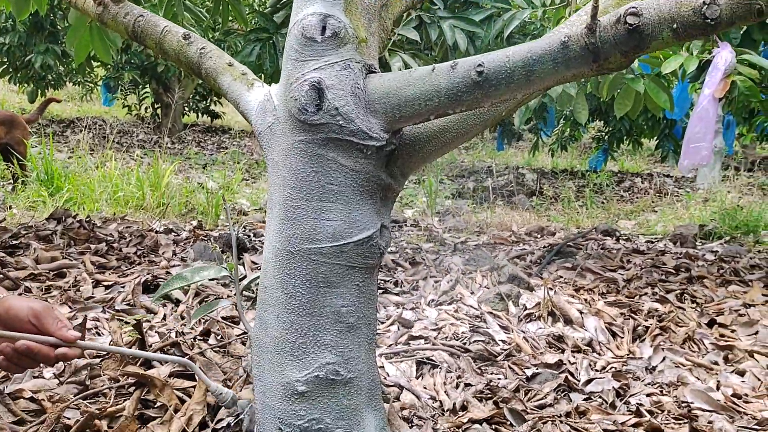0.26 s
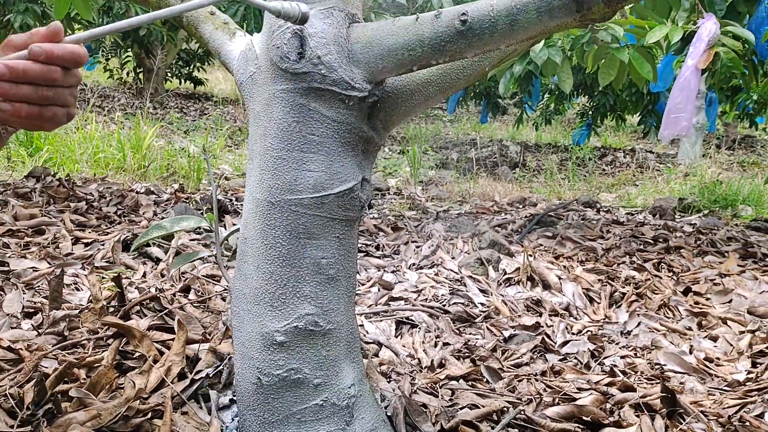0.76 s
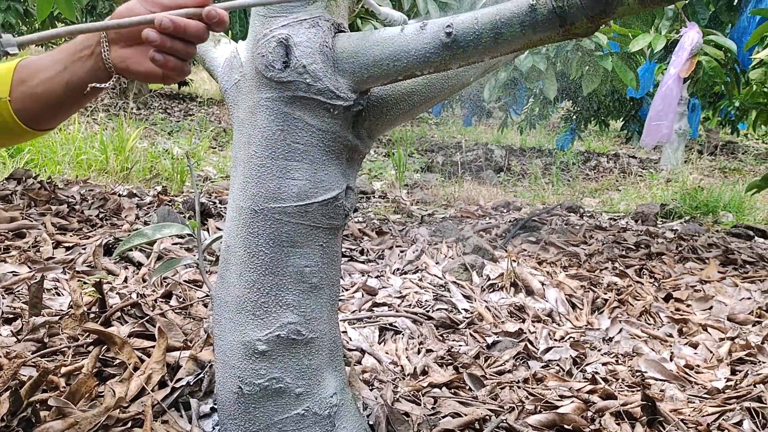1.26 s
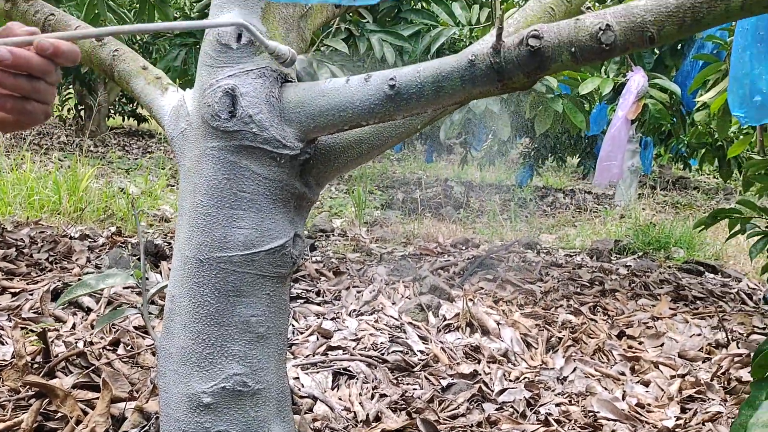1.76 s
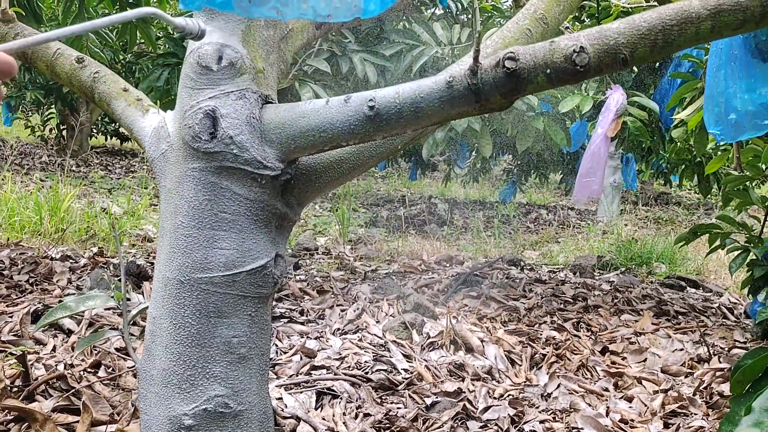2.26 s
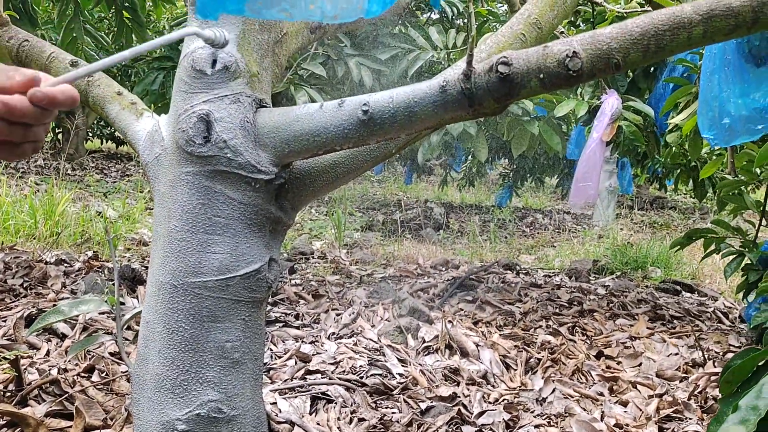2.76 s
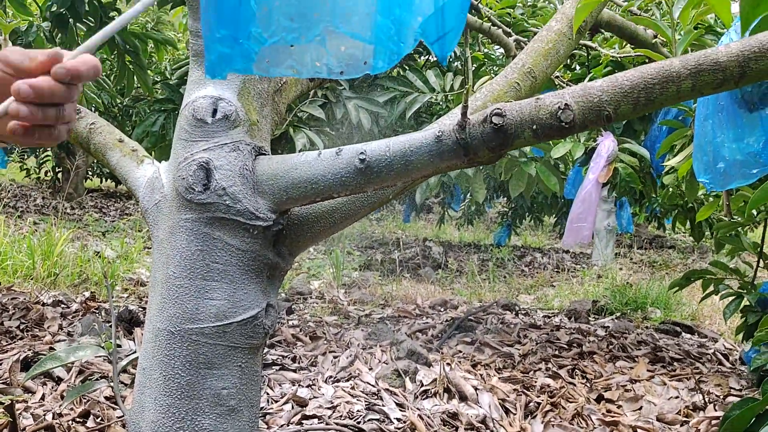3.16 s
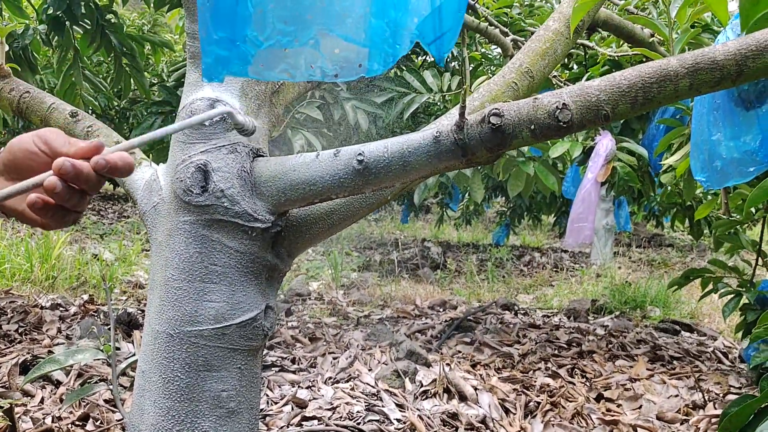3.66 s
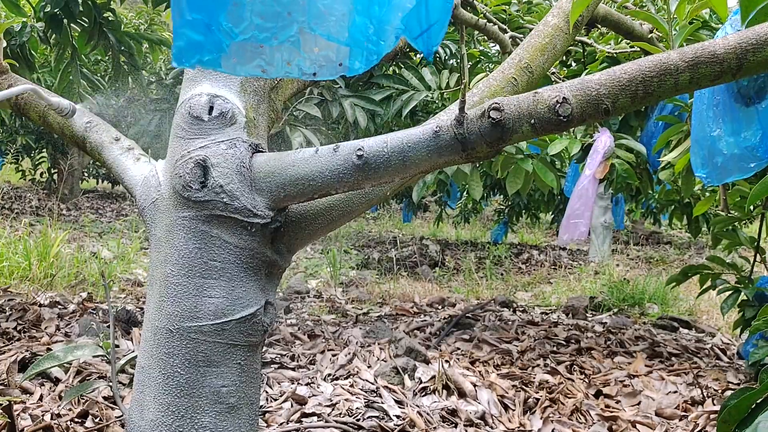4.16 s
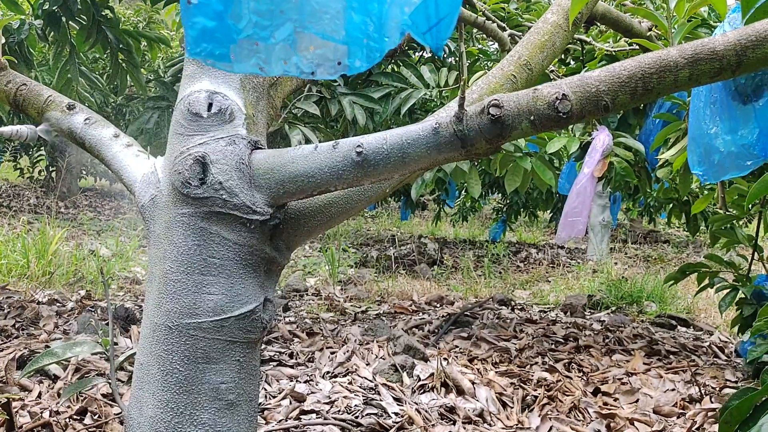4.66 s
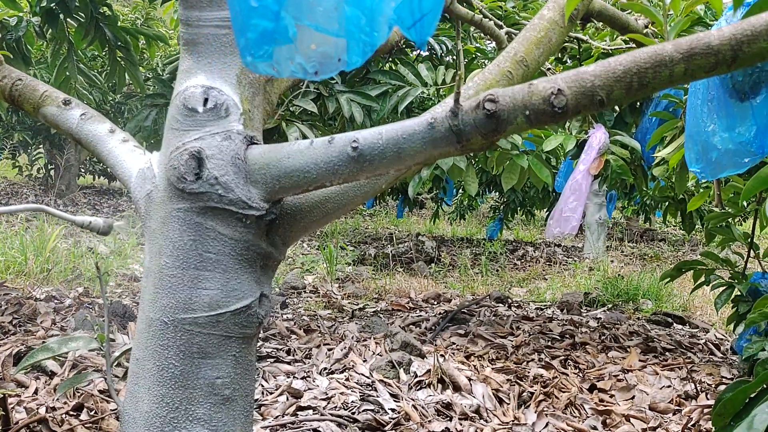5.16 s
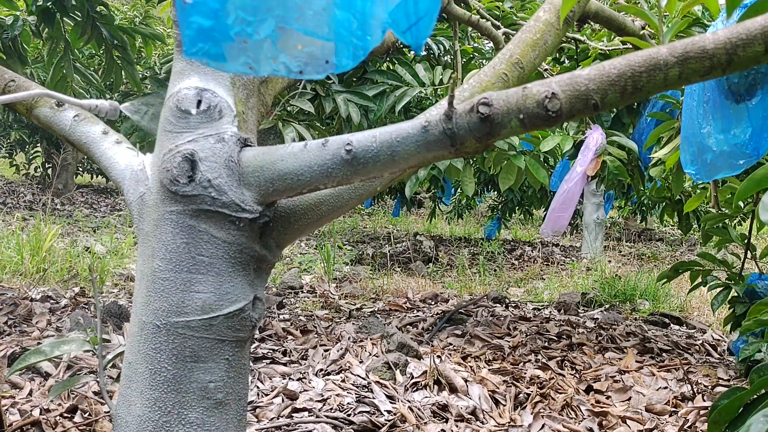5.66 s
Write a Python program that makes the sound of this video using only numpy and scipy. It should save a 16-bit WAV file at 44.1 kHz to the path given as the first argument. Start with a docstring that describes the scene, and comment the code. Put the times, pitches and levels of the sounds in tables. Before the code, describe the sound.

Pressurised liquid fizzes from a wand onto a tree trunk, swelling and fading, with spattering drops and several bright metal clicks outdoors.

```python
"""In an orchard, a backpack sprayer wets a tree trunk, close by and a little to the left. Shaped noise gives
the steady hiss of the nozzle, and random impulses the sizzle of its fan sweeping over bark. Single drops are
short noise bursts, and damped tones ring as the nozzle nears the bark; the metal wand clicks sharply through
its damped modes. Soft bumps, a puff of air and a distant rumble lie underneath; the recorder's gain ducks after
loud clicks."""
import sys
import numpy as np
from scipy import signal
from scipy.fft import rfft, irfft, next_fast_len
from scipy.io import wavfile
from scipy.ndimage import uniform_filter1d, minimum_filter1d, map_coordinates

SR = 44100
rng = np.random.default_rng(int(sys.argv[2]) if len(sys.argv) > 2 else 0)


def int16_out(signal):
    """Quantize to a 16-bit WAV file."""
    q = np.round(np.clip(np.atleast_2d(signal).T, -1, 1) * 32767)
    wavfile.write(sys.argv[1], SR, q.astype(np.int16))


N = 260190  # length [samples]

# In every table, "left minus right" is positive when the left ear is louder.
# The nozzle's own hiss, before random wobble: (time [s], level [dB])
JET_LEVEL = [(0, -46), (.38, -46), (.58, -41.5), (.98, -42), (1.3, -44), (1.7, -40.5), (2.05, -43),
             (2.5, -45.5), (3.35, -46.5), (3.62, -41), (4.1, -49.5), (4.42, -47), (4.6, -41.5),
             (4.75, -47.5), (4.9, -47), (5.3, -41.5), (5.9, -47)]
# Hiss colour as the wand turns: (time [s], main resonance [Hz])
JET_RESONANCE = [(0, 2860), (.35, 2340), (1.1, 2920), (1.42, 3240), (1.65, 2440), (2.25, 2700), (2.6, 3670),
                 (3.05, 4030), (3.5, 3070), (3.7, 4200), (3.9, 2700), (4.35, 2620), (4.65, 3060),
                 (4.88, 2560), (5.1, 3050), (5.9, 2960)]
# Narrow spray resonances as the nozzle passes the wood:
# (start [s], end [s], start frequency [Hz], end frequency [Hz], greatest boost [dB])
GLIDING_RESONANCES = [(.79, 1.13, 1700, 1596, 10), (1.3, 1.48, 7400, 7100, 12),
                      (2.035, 2.2, 2600, 2600, 9.5), (2.84, 3.018, 2940, 2820, 5.5),
                      (4.29, 4.48, 4950, 3750, 6), (4.747, 5.027, 2350, 1680, 11)]
# Brief rings of the cavity as the nozzle comes close to the bark: (time of peak [s], level [dB], pitch [Hz],
# rise time [s])
CAVITY_RINGS = [(.7, -31.5, 1890, 0.0013), (1.45, -35, 2230, .0018), (1.672, -28, 2360, 0.0011),
                (1.7742, -28.5, 2310, 0.0015), (3.497, -32, 2750, 0.0018)]
# Larger drops and spits on the bark: (time of peak [s], level before colouring [dB], rise time [s])
SPIT_DROPS = [(0.1114, -30.5, 0.0011), (0.133, -43, 0.0014), (.382, -37, 0.00065), (0.466, -34, 0.0014),
              (.584, -44, .0007), (0.596, -36.5, 0.0013), (0.699, -34.5, 0.0019), (0.823, -30.5, .0008),
              (.8648, -24, 0.00043), (0.929, -33.5, 0.00095), (1.108, -38, 0.0019), (1.37, -33.5, 0.0028),
              (1.449, -31.5, 0.0016), (1.573, -33, 0.00077), (1.698, -30, 0.0009), (1.734, -29, 0.0027),
              (1.7725, -19, 0.00078), (1.965, -29, .0009), (2.098, -32, .0008), (2.203, -39, 0.0022),
              (3.481, -30.5, 0.0023), (4.308, -38, 0.00087), (4.834, -41, .0016), (5.356, -37, 0.0041),
              (5.545, -41, 0.0011), (5.846, -28.5, 0.00051)]
# Clicks of the wand: (time [s], level [dB], contact length [s], favoured ring [Hz],
# treble lift [dB], knock weight relative to the click [dB], left minus right [dB])
WAND_CLICKS = [(3.1349, -29.5, 0.00023, 3400, 5, -55, 17), (3.275, -20, 0.0066, 3500, 8, -55, 4.5),
               (3.2887, -21.5, 0.0043, 2970, 4.5, -51, 6), (3.9845, -15.5, 0.0032, 3450, 9, -32, 8),
               (5.2673, -26, 0.0024, 2240, -4, -38, 7.5)]
# Damped modes of the wand: (centre [Hz], width [Hz], strength [dB], left minus right [dB])
WAND_MODES = [(3030, 240, 4, 6), (3550, 330, 1.5, -1), (4300, 350, -5, -1), (6550, 300, -3, -14),
              (8550, 160, -5, -2), (9450, 180, -3, 3), (11080, 280, -1.5, 3), (11850, 220, -2, -1),
              (13250, 380, -2, -2), (15000, 240, -1, 3)]
# Thumps of the hand that holds the microphones: (time [s], impulse level before filtering [dB])
HAND_THUMPS = [(.5817, -28.5), (.623, -38)]
# Knocks and dull rings of gear and handled microphones: (time [s], level before a common lift [dB],
# pitch [Hz], T60 [s], rustle share of power [0-1], left minus right [dB])
DULL_KNOCKS = [(.582, -50.5, 442, 0.23, 0.02, -8), (0.693, -48, 492, 0.13, 0.15, -4),
               (0.696, -49, 1020, 0.06, 0.3, 1), (2.036, -40, 2020, 0.041, 0.5, 10),
               (2.037, -38.5, 550, 0.069, 0.3, -3), (2.051, -43, 378, 0.088, 0.75, 2),
               (2.053, -47.5, 1820, 0.11, 0.94, 0), (2.062, -47.5, 540, 0.17, 0.66, 2),
               (2.086, -47, 109, 0.17, 0.1, 2), (3.476, -48.5, 1170, 0.091, 0.35, 2)]
# Spectra of nozzle hiss, droplet sizzle and distant rumble: (frequency [Hz], relative density [dB])
HISS_SPECTRUM = [(300, -24), (1000, -7), (1500, 4), (2000, -8.5), (3200, 0), (4200, 5.5), (5400, -2.5),
                 (6300, -16), (8000, -7), (11000, -8), (13200, -10.5), (15000, -9)]
SIZZLE_SPECTRUM = [(300, -34), (1000, -13.5), (1450, -13), (2100, 2), (2900, 3.5), (4800, 2), (6000, 3),
                   (7300, 3), (8800, -1.5), (12500, -4), (15500, -1)]
RUMBLE_SPECTRUM = [(20, -13.5), (45, -13), (80, -1.5), (110, 0), (190, -2.5), (290, -10.5), (450, -15.5),
                   (700, -12), (1200, -18), (3000, -29.5), (15000, -58)]
# Balance of the hiss and of the spatter: (frequency [Hz], left minus right [dB])
JET_BALANCE = [(1300, 18), (2400, 29.5), (3100, 11.5), (4400, 2), (6000, 5), (8100, 19), (15000, 23.5)]
SPATTER_BALANCE = [(700, 0.5), (1400, 9.5), (2100, 14), (2750, 7.5), (4400, -5.5), (8000, 5), (15000, 7.5)]
# Likeness of the rumble in the two ears: (frequency [Hz], coherence [-1 to 1])
RUMBLE_COHERENCE = [(25, 0.12), (70, 0.96), (150, 0.9), (300, 0.86), (650, -0.24)]
# Fine mist settling on leaves, before the spatter's common lift: (time [s], level [dB])
MIST_LEVEL = [(0, -43.5), (1.18, -49.5), (1.5, -44.5), (2.02, -42), (2.5, -52.5), (3.05, -53.5), (3.2, -57),
              (3.42, -50.5), (4.4, -60), (4.95, -54), (5.1, -45.5), (5.9, -51)]
# Sweeps of the fan across bark: (time of middle [s], level before the common lift [dB], half length [s],
# lowest resonance of the hiss [Hz], spatter's top octave [dB], top octave left minus right [dB])
BARK_SWEEPS = [(0.121, -36.5, 0.05, 1500, 2, -7), (0.35, -44, 0.52, 2110, 0.5, -1),
               (0.705, -35.5, 0.057, 1670, -1.5, -11), (0.962, -45.5, 0.16, 1763, 2, -5),
               (1.39, -36.5, 0.12, 2200, 2, -8), (1.618, -34.5, 0.044, 1860, -3.5, -13),
               (1.786, -32.5, 0.1, 2120, -7, -22), (1.93, -31, 0.068, 1640, 3.5, -8),
               (2.253, -47, 0.12, 2140, -1, -4), (2.747, -38, 0.016, 1950, -1.5, -3),
               (2.806, -45.5, 0.048, 2100, -1, -1), (3.5, -39, 0.068, 1750, -0.5, -8),
               (3.626, -40, 0.083, 1890, -1.5, -9), (3.932, -40, 0.15, 1960, 2.5, -5),
               (4.195, -50, 0.12, 1960, 4, 0), (4.6, -47, 0.13, 1930, 2.5, -8),
               (5.255, -45, 0.098, 1880, -6, -19), (5.551, -41, 0.14, 1940, -0.5, -10),
               (5.808, -38, 0.064, 2080, -1, -7)]
# Delays of the echoes off the branches: (delay [s])
ECHO_DELAYS = [.0013, .0024, .0037]

TOP_HZ = 15900  # upper limit of the output band
FREE_HZ = 2084  # lowest resonance of the hiss away from the bark
SWEEP_SHAPE = 2.1  # 1 = pointed swell, 2 = round swell
APPROACH = 1.29  # the nozzle stays near the bark this much longer than its fan hits it
REBOUND_DB = -13  # hiss thrown back by the bark, relative to the sweep
MIST_TOP_DB, MIST_SIDE_DB = 3, -3  # top octave of the mist, and its left minus right
FULL_AT_DB = -39  # spatter level, before its lift, at which the hollow near 6 kHz is filled
COARSEN = 0.26  # dB of colour per dB of spatter level
SPLASH_DB, SPLASH_T60 = -3, 0.21  # scatter after a spit of 2 ms rise time or more; T60 in s


def amp(db):
    """Decibels express the logarithm of an amplitude ratio; return that ratio."""
    return 10 ** (np.asarray(db) / 20)


def unit(x):
    """Mean power sets the level of noise: scale to rms 1."""
    return x / np.sqrt(np.mean(x ** 2) + 1e-20)


def left_right_db(side_db):
    """A level difference between the ears places a source: half of it goes to each side."""
    return np.array([[side_db], [-side_db]]) / 2


def along(points, hz):
    """Frequency is perceived logarithmically: read (Hz, value) points on a log axis."""
    f, v = np.transpose(points)
    return np.interp(np.log(hz + 1), np.log(f + 1), v)


def curves(rows, t):
    """Linear interpolation of each column after the time, read at times t."""
    s, *cols = np.transpose(rows)
    return [np.interp(t, s, c) for c in cols]


def wobble(rate):
    """Slow random fluctuation: a smooth curve through `rate` random knots a second."""
    knots = rng.standard_normal(N // 50)
    return map_coordinates(knots, [np.arange(N) * rate / SR], mode="wrap")


def filtered(x, gain):
    """Linear filtering multiplies the spectrum by a gain that depends on frequency."""
    size = next_fast_len(N + SR // 4)
    return irfft(rfft(x, size) * gain(np.fft.rfftfreq(size, 1 / SR)), size)[..., :N]


def sides(points, hz):
    """Interaural level difference by frequency, as left and right gains."""
    half_db = along(points, hz) / 2
    return amp([half_db, -half_db])


def shaped(x, colour_db, patchy_db):
    """Short-time filtering: a colour that moves with time, with drifting patches of random gain."""
    hz, t, z = signal.stft(x, SR, nperseg=1024)
    field = rng.standard_normal(z.shape[1:])
    field = uniform_filter1d(uniform_filter1d(field, size=4, axis=0), size=9, axis=1)
    patches = patchy_db * unit(field) / (1 + (hz[:, None] / 7000) ** 2)
    gain = amp(colour_db(hz[:, None], t) + patches)
    return signal.istft(z * gain, nperseg=1024)[1][:, :N]


def add(track, s, sound):
    """Superposition: mix a sound into a track at time s."""
    part = track[..., round(s * SR):][..., :sound.shape[-1]]
    part += sound[..., :part.shape[-1]]


def sweep_gains(t):
    """Passage of a fan over a target: each sweep swells and fades, one row of gain each."""
    s, db, half = np.transpose(BARK_SWEEPS)[:3, :, None]
    return amp(db) * np.exp(-np.abs((t - s) / half) ** SWEEP_SHAPE)


def sweeps(t):
    """Power addition of all sweeps, and the hiss's lowest resonance, which sinks near the bark."""
    s, _, half, low_hz = np.transpose(BARK_SWEEPS)[:4, :, None]
    near = 1 / (1 + ((t - s) / (APPROACH * half)) ** 4)
    sink_hz = np.max((FREE_HZ - low_hz) * near, axis=0)
    return np.linalg.norm(sweep_gains(t), axis=0), FREE_HZ - sink_hz


def spatter_db(t):
    """Incoherent sources add in power: settling mist plus sweeps, before the common lift."""
    return 20 * np.log10(np.hypot(amp(curves(MIST_LEVEL, t)[0]), sweeps(t)[0]))


def treble_db(t):
    """Power-weighted mean: sweeps and mist set the spatter's top octave, left and right, by their share."""
    share = (sweep_gains(t) / amp(spatter_db(t))) ** 2
    mist_share = 1 - share.sum(axis=0)
    mist_part = np.outer([MIST_TOP_DB, MIST_SIDE_DB], mist_share)
    top_db, side_db = np.transpose(BARK_SWEEPS)[4:] @ share + mist_part
    return np.array([top_db + side_db / 2, top_db - side_db / 2])[:, None]


def glides_db(hz, t, width=0.024):
    """Resonance between nozzle and bark: narrow bands stand out for a moment and slide in pitch."""
    total = 0
    for start, end, from_hz, to_hz, db in GLIDING_RESONANCES:
        u = np.clip((t - start) / (end - start), 0, 1)
        centre = from_hz + (to_hz - from_hz) * u
        swell = np.sqrt(4 * u * (1 - u))
        total = total + db * swell * np.exp(-((hz / centre - 1) / width) ** 2)
    return total


def branches_db(hz, t, depth_db=1.25, drift=0.05):
    """Comb filtering by short echoes off the branches at each ear; the teeth drift as the wand moves."""
    total = 0
    for delay in ECHO_DELAYS:
        sway = [np.interp(t, np.arange(N) / SR, wobble(1.93)) for ear in "LR"]
        sway = np.array(sway)[:, None]
        total = total + depth_db * np.cos(2 * np.pi * hz * delay * (1 + drift * sway))
    return total


def orchard(level_db=-50.5):
    """Partial coherence: a distant rumble mixed from mid and side noise, alike in both ears only in the bass."""
    def mid_side_gain(hz):
        turn = np.arccos(np.clip(along(RUMBLE_COHERENCE, hz), -1, 1)) / 2
        return amp(along(RUMBLE_SPECTRUM, hz)) * [np.cos(turn), np.sin(turn)]
    mid, side = filtered(rng.standard_normal((2, N)), mid_side_gain)
    return unit(np.array([mid + side, mid - side])) * amp(level_db)


def nozzle(main_db=4.5, main_octaves=0.37, low_db=6.3, cut_db=14, edge_octaves=0.41):
    """Jet break-up: the liquid sheet tears into mist, a hiss with two moving resonances, louder near bark."""
    def colour_db(hz, t):
        low_hz, main_hz = sweeps(t)[1], curves(JET_RESONANCE, t)[0]
        low, main = np.log2((hz + 1) / low_hz), np.log2((hz + 1) / main_hz)  # octaves from each resonance
        humps = main_db * np.exp(-(main / main_octaves) ** 2) + low_db * np.exp(-(10 * low) ** 2)
        # a reflection off the trunk combs the hiss; its teeth glide as the wand moves
        comb_db = 2.8 * np.cos(2 * np.pi * 4 * hz / main_hz) * np.exp(-(main / 1.6) ** 2)
        bass_cut_db = cut_db * np.clip(-low / edge_octaves, 0, 1)
        resonances_db = humps + comb_db + branches_db(hz, t) + glides_db(hz, t)
        return along(HISS_SPECTRUM, hz) + resonances_db - bass_cut_db
    hiss = shaped(rng.standard_normal((2, N)), colour_db, patchy_db=1.5)
    placed = unit(filtered(hiss, lambda hz: sides(JET_BALANCE, hz)))
    t = np.arange(N) / SR
    level = np.hypot(amp(curves(JET_LEVEL, t)[0]), amp(REBOUND_DB) * sweeps(t)[0])
    return placed * level * amp(1.85 * wobble(25))


def spatter(drops_per_s=9000, size_spread_db=3, mist=0.75, splash_hz=7300, body_hz=6000, lift_db=2.0):
    """Shot noise: droplets of uneven size strike bark; light mist sounds hollow, a full hit sizzles in one band."""
    hits = (rng.random(N) < drops_per_s / SR) * amp(size_spread_db * rng.standard_normal(N))
    patter = unit(hits * rng.standard_normal((2, N))) + mist * rng.standard_normal((2, N))

    def colour_db(hz, t):
        full_db = COARSEN * (spatter_db(t) - FULL_AT_DB)
        splash_db = np.maximum(full_db, 0) * np.exp(-((hz - splash_hz) / 750) ** 2)
        hollow_db = np.minimum(full_db, 0) * np.exp(-((hz - body_hz) / 1400) ** 2)
        top_db = treble_db(t) * np.clip((hz - 7800) / 1200, 0, 1)
        return along(SIZZLE_SPECTRUM, hz) + top_db + splash_db + hollow_db + glides_db(hz, t)
    patchy = shaped(patter, colour_db, patchy_db=2.4)
    sizzle = unit(filtered(patchy, lambda hz: sides(SPATTER_BALANCE, hz)))
    flutter_db = 0.9 * wobble(30) + 1.4 * wobble(170)
    return sizzle * amp(spatter_db(np.arange(N) / SR) + lift_db + flutter_db)


def plops(side_db=10, small_db=-9, small_hz=2900, count=350):
    """Cavity resonance: as the nozzle comes close to the bark, the gap rings briefly; many small plops follow
    the spatter's level."""
    out, t = np.zeros((2, N)), np.arange(SR // 25) / SR
    when, size, pitch = rng.random((count, 3)).T
    times = when * N / SR
    small_levels = spatter_db(times) + small_db + 10 * size
    small_pitches = small_hz * 2 ** (pitch - 0.5)
    small = zip(times, small_levels, small_pitches, np.full(count, 0.0008))
    for s, db, hz, rise in [*CAVITY_RINGS, *small]:
        jitter = 0.05 * np.cumsum(rng.standard_normal(len(t)))
        phase = 2 * np.pi * (hz * t + rng.random((2, 1))) + jitter
        envelope = t / rise * np.exp(1 - t / rise)
        add(out, s - rise, amp(db + left_right_db(side_db)) * np.sin(phase) * envelope)
    return out


def spits():
    """Impact and scatter: a larger drop smacks down into a brief splash; quick, small ones tick brightest."""
    out, t = np.zeros((2, N)), np.arange(SR // 8) / SR
    for s, db, rise in SPIT_DROPS:
        u = t / rise
        size = min(rise / 0.002, 1)
        splash = size * amp(SPLASH_DB - 60 * t / SPLASH_T60) * (1 - np.exp(-u))
        envelope = u * np.exp(1 - u) + splash
        brighten = [1, -max(1 - 2 * size, 0)]
        noise = signal.lfilter(brighten, 1, rng.standard_normal((2, len(t))))
        add(out, s - rise, amp(db) * envelope * unit(noise))
    return filtered(out, lambda hz: amp(along(SIZZLE_SPECTRUM, hz)) * sides(SPATTER_BALANCE, hz))


def thumps(top_hz=410, side_db=-22):
    """Low-passed impulse: a hand bumps dully next to the right microphone, one push and its recoil."""
    out = np.zeros(N)
    for s, db in HAND_THUMPS:
        out[round(s * SR)] = amp(db) * SR / top_hz
    dull = signal.sosfilt(signal.butter(6, top_hz, fs=SR, output="sos"), out)
    return signal.lfilter(*signal.butter(1, 110, "high", fs=SR), dull) * amp([[side_db], [0]])


def bumps(lift_db=6.0):
    """Strong damping: dull knocks are a tone, a lower body tone and a muffled rustle that die quickly."""
    out, t = np.zeros((2, N)), np.arange(SR // 4) / SR
    for s, db, hz, t60, rustle, side_db in DULL_KNOCKS:
        tones = np.sin(2 * np.pi * hz * t) + 0.17 * np.sin(2 * np.pi * 0.458 * hz * t)
        muffle = signal.butter(2, [hz / 2, 1.02 * hz], "band", fs=SR)
        noise = unit(signal.lfilter(*muffle, rng.standard_normal((2, len(t)))))
        share = np.clip(rustle, 0, 1)
        mix = np.sqrt(1 - share) * tones + np.sqrt(share) * noise
        thud = mix * amp(-60 * t / t60) * (1 - np.exp(-t / 0.0013))
        add(out, s, amp(db + lift_db + left_right_db(side_db)) * thud)
    return out


def breeze(middle_s=2.86, length_s=0.089, level_db=-50, top_hz=120):
    """Flow noise: one puff of air rumbles on the microphones, more on the right."""
    since = np.arange(N) / SR - middle_s
    noise = rng.standard_normal((2, N))
    rumble = unit(filtered(noise, lambda hz: hz / (hz + 20) / (1 + (hz / top_hz) ** 4)))
    return rumble * amp(level_db + np.array([[-4], [2]])) * np.exp(-(since / length_s) ** 2)


def wand(crack=0.28, ring_db=3, t60=0.044, echo_db=-21, echo_t60=0.15):
    """Modal excitation: a short rasping contact of metal rings the tube, and the trees scatter it back."""
    out, t = np.zeros((2, N)), np.arange(SR // 8) / SR
    hz = np.fft.rfftfreq(len(t), 1 / SR)

    def mode(centre, width, db):
        damping = 1j * hz * width
        return amp(db) * damping / (centre ** 2 - hz ** 2 + damping)
    tube = crack + sum(mode(centre, width, db + left_right_db(side))
                       for centre, width, db, side in WAND_MODES)
    thin_tube = hz ** 2 / (hz ** 2 + 1700 ** 2)  # a thin tube radiates little bass
    for s, db, contact, ring_hz, bright_db, knock_db, side_db in WAND_CLICKS:
        after = np.maximum(t - contact, 0)
        press = 1 + 0.32 * np.sin(np.pi * t / contact)  # the contact is hardest in its middle
        heft = min(contact / 0.003, 1) ** 2  # the lightest touch leaves almost no tail
        tail = heft * 0.78 * amp(-60 * after / t60)
        echo = heft * amp(echo_db - 60 * t / echo_t60)
        force = np.where(t < contact, press, tail) + echo
        rasp = force * rng.choice([-1, 1], (2, len(t)))
        # each point of contact favours one low mode
        treble = amp(bright_db * np.clip((hz - 4000) / 6000, 0, 1))
        colour = (tube + mode(ring_hz, 280, ring_db)) * treble
        ring = irfft(rfft(rasp) * colour * thin_tube, len(t))
        ring /= np.sqrt(np.mean(ring[:, t < contact] ** 2, axis=1, keepdims=True))
        u = t / 0.00037
        knock = 8 * amp(knock_db) * u * (2 - u) * np.exp(-u)  # one short push of the whole wand
        add(out, s, amp(db + left_right_db(side_db)) * (ring + knock))
    return out


def rounded(x):
    """Soft saturation: the recorder rounds off the tallest peaks."""
    return x / (1 + (x / 0.48) ** 6) ** (1 / 6)


def scene():
    """Superposition of all sources at the two microphones."""
    spray = nozzle() + spatter() + plops() + spits()
    handling = thumps() + bumps() + wand()
    return orchard() + spray + handling + breeze()


def record(dry, threshold_db=-25, ratio=0.65, hold_s=0.41, release_db_per_s=14):
    """Automatic gain control: gain ducks after a loud click, holds and recovers; then peaks and band are limited."""
    t = np.arange(N) / SR
    power = signal.lfilter(*signal.butter(1, 40, fs=SR), np.mean(dry ** 2, axis=0))
    excess_db = np.maximum(10 * np.log10(np.abs(power) + 1e-12) - threshold_db, 0)
    needed_db = -ratio * excess_db
    half = int(hold_s * SR / 2)
    held_db = minimum_filter1d(needed_db, size=2 * half + 1, origin=half)
    recovery_db = release_db_per_s * t
    gain_db = np.minimum.accumulate(held_db - recovery_db) + recovery_db
    ducked = dry * amp(np.interp(t - 0.002, t, gain_db))  # the gain reacts a moment late
    return filtered(rounded(ducked), lambda hz: hz < TOP_HZ)


dry = scene()
out = record(dry)
int16_out(out)
```